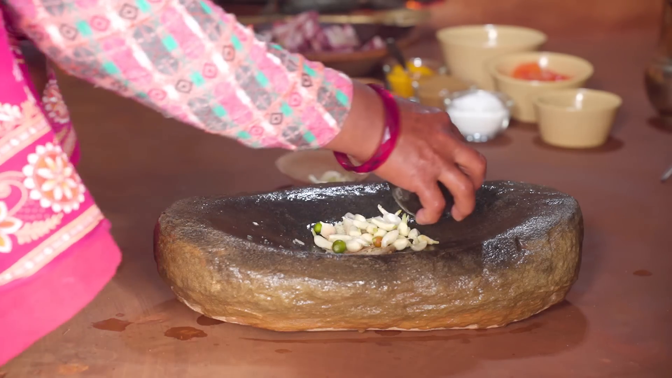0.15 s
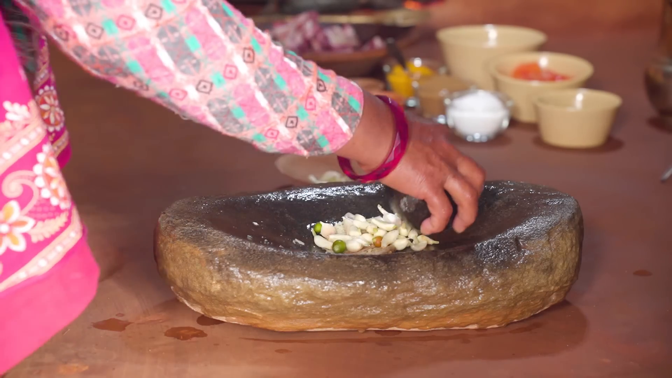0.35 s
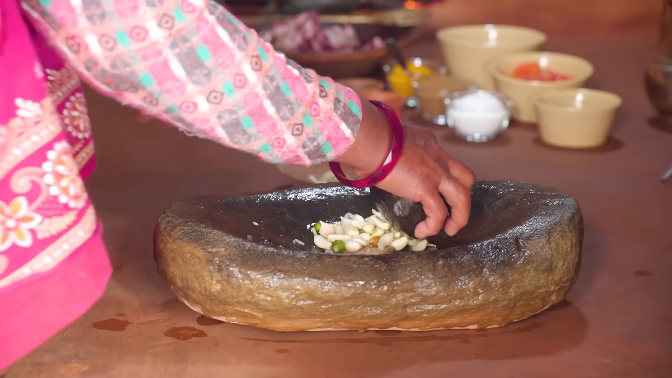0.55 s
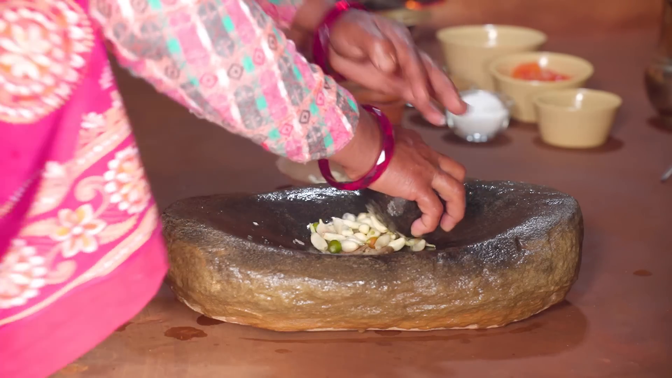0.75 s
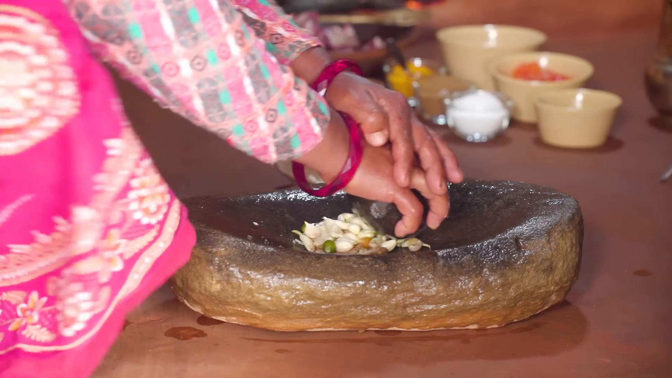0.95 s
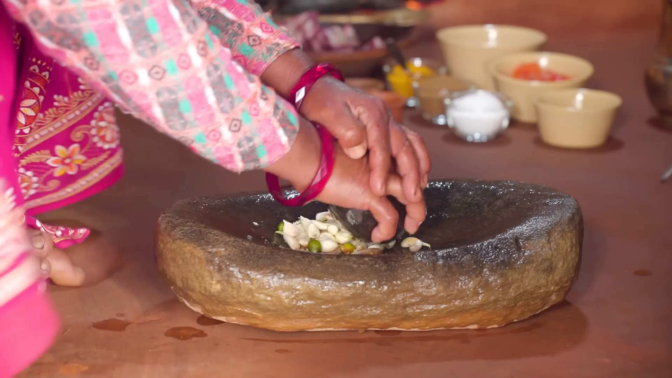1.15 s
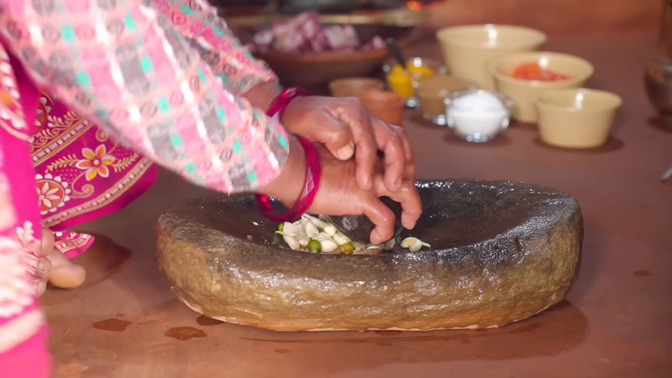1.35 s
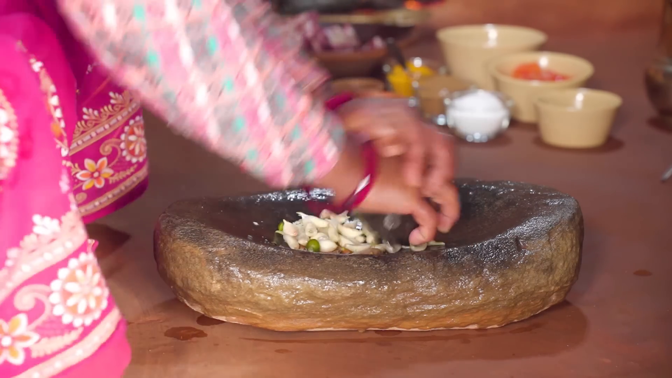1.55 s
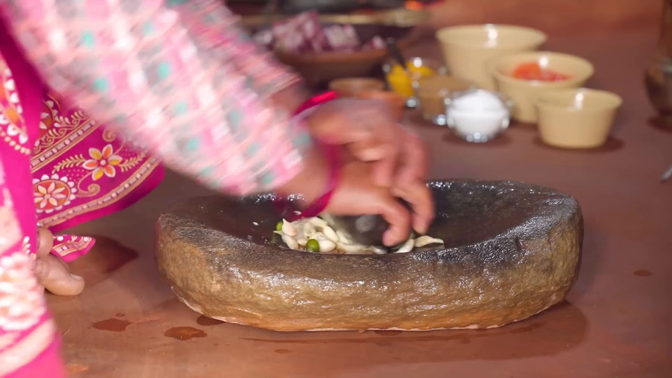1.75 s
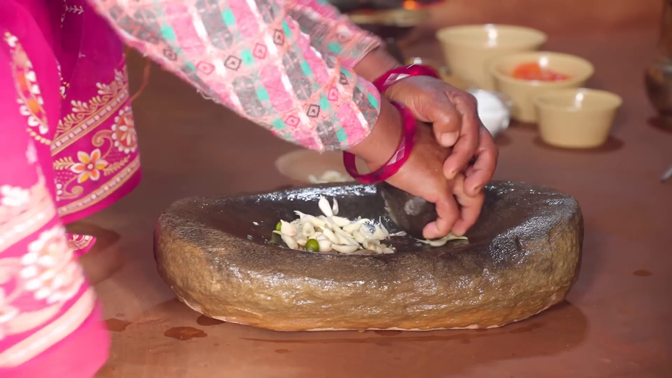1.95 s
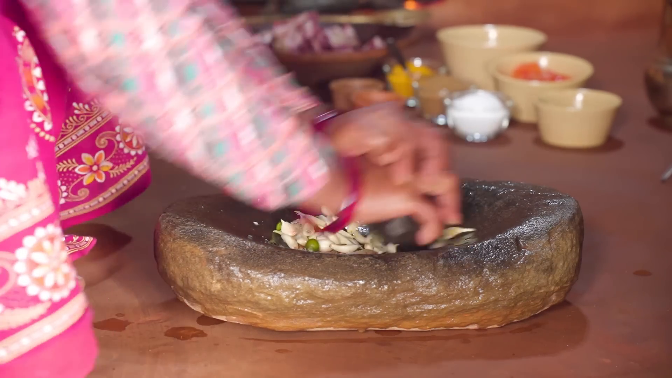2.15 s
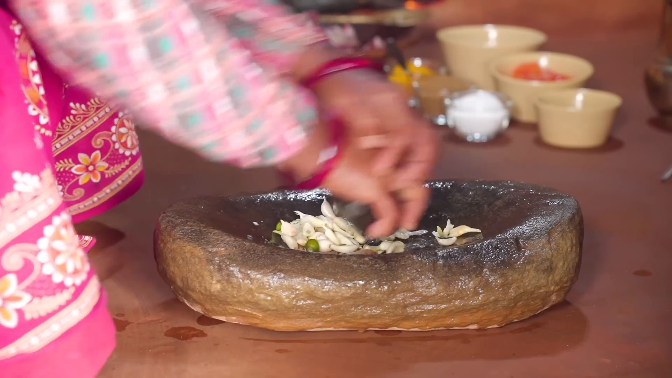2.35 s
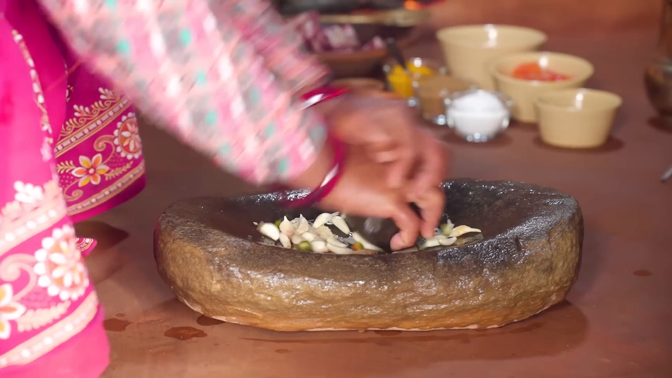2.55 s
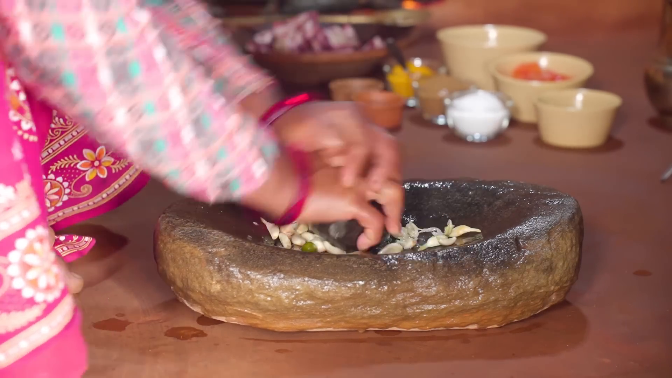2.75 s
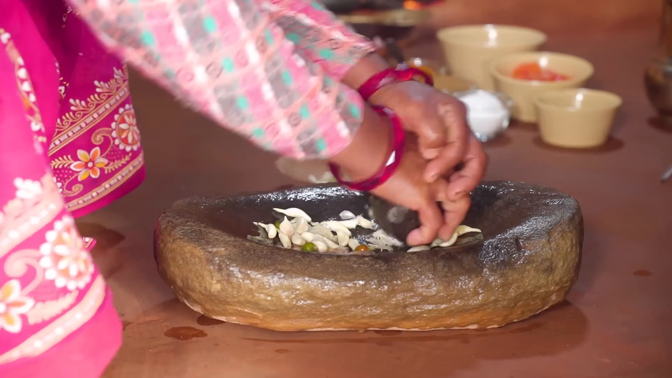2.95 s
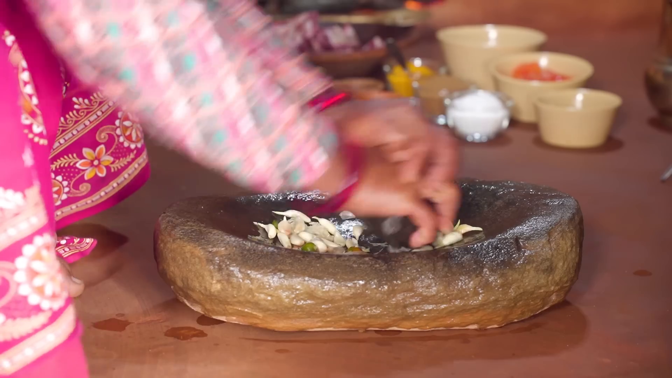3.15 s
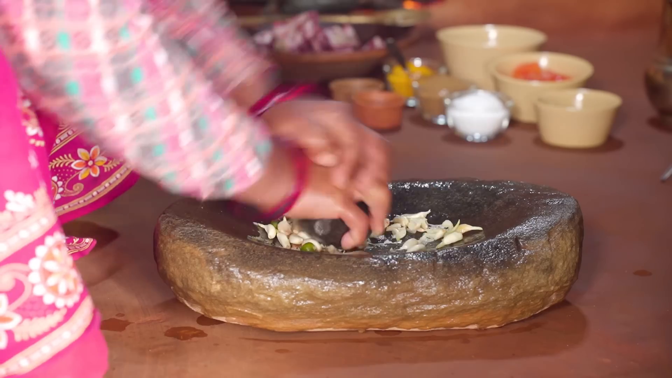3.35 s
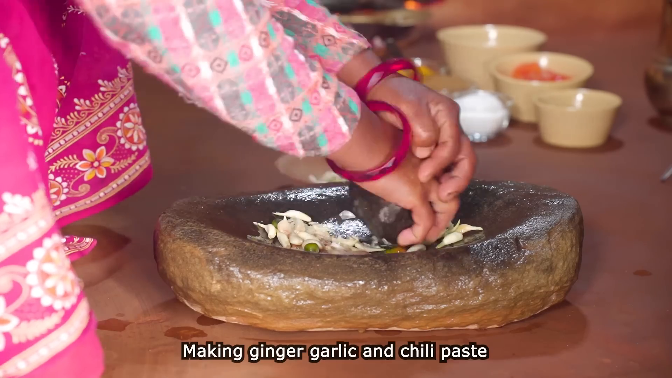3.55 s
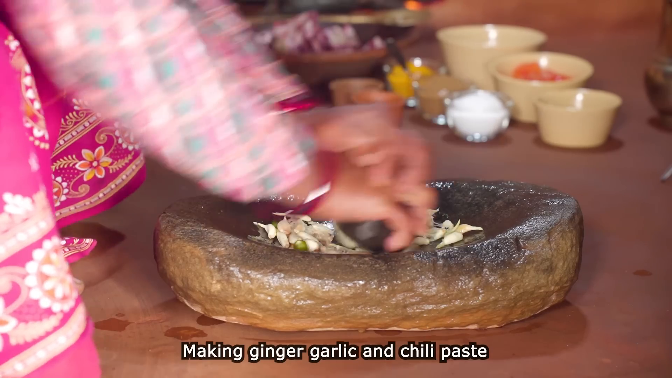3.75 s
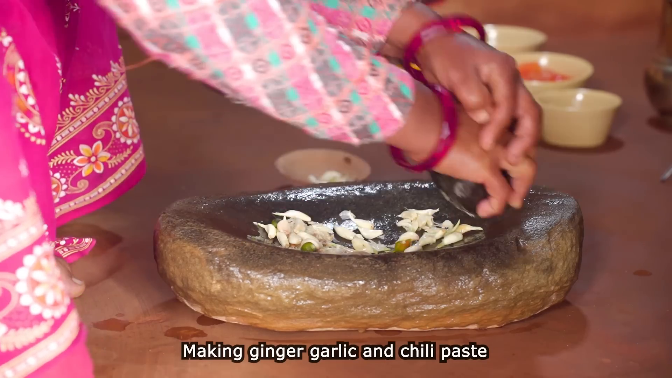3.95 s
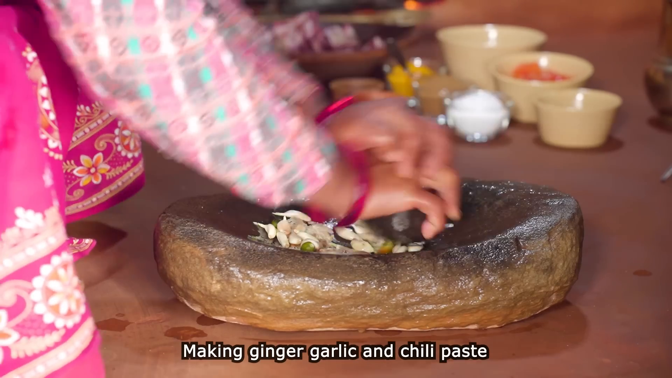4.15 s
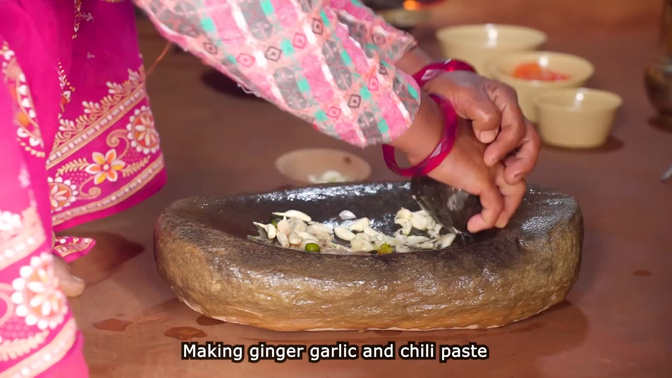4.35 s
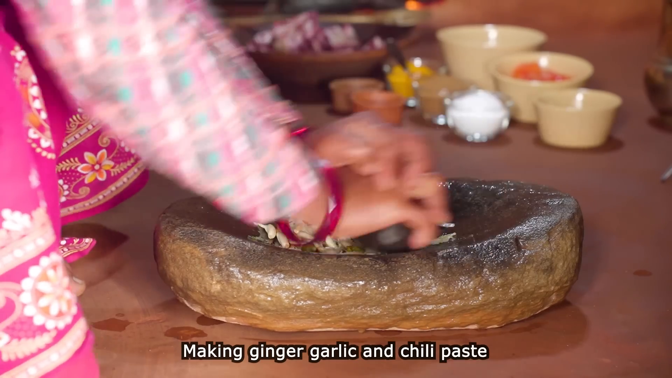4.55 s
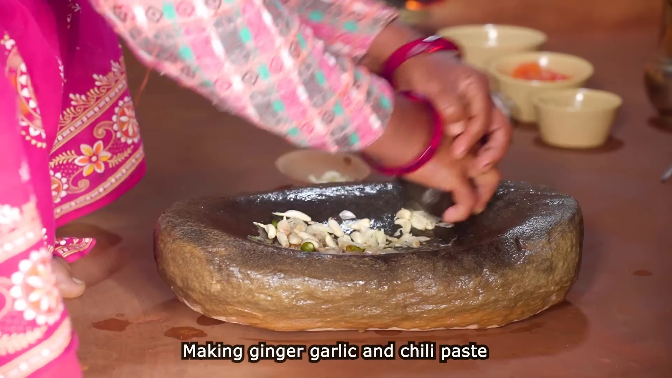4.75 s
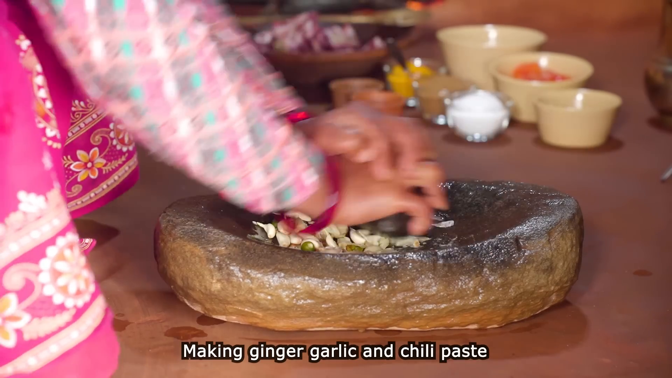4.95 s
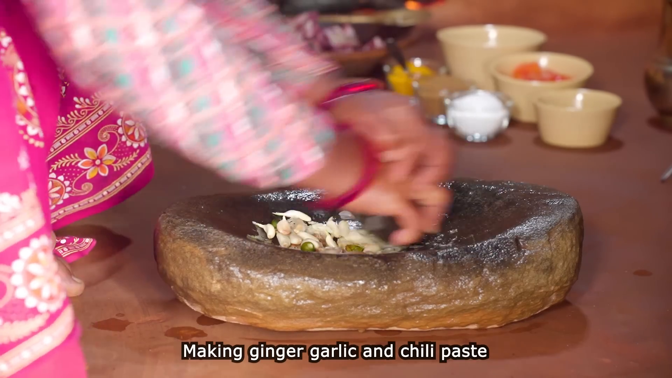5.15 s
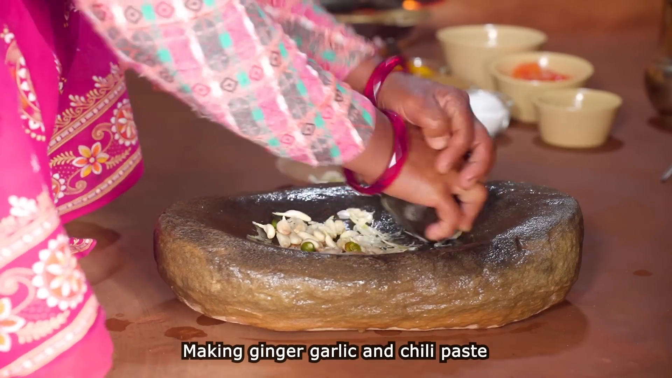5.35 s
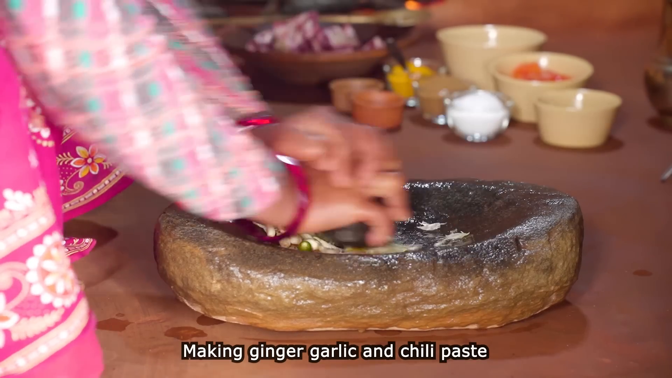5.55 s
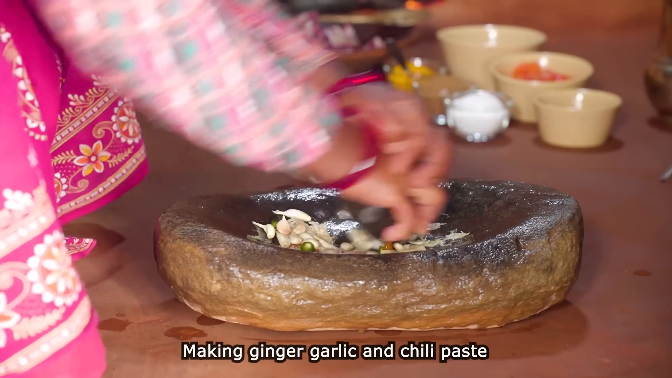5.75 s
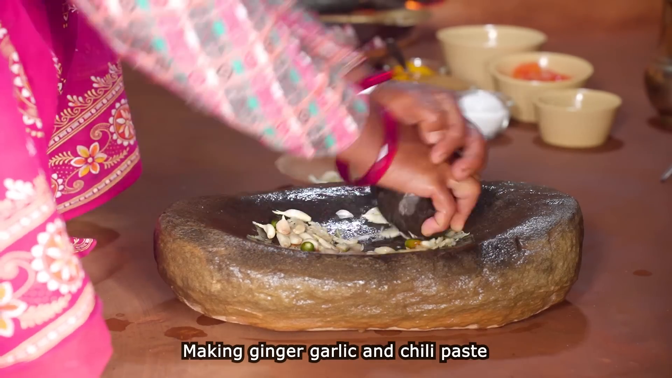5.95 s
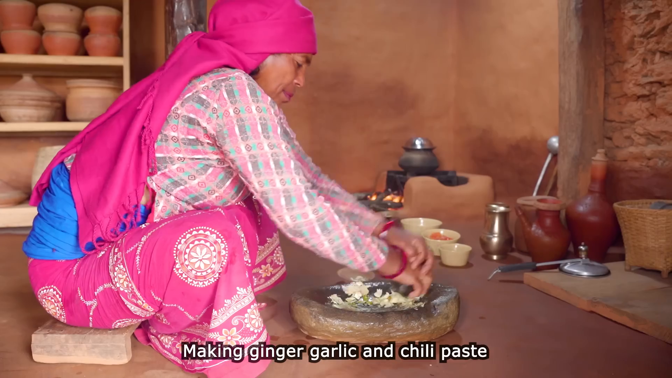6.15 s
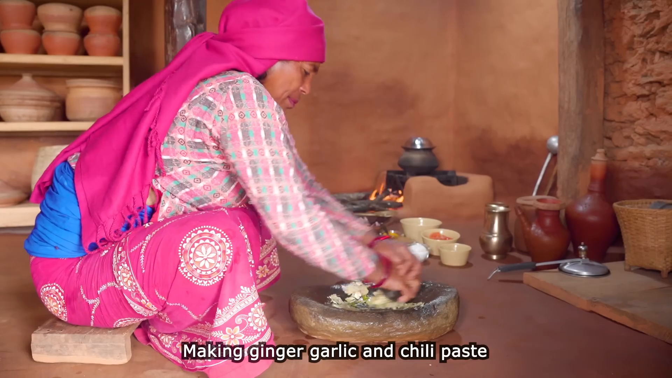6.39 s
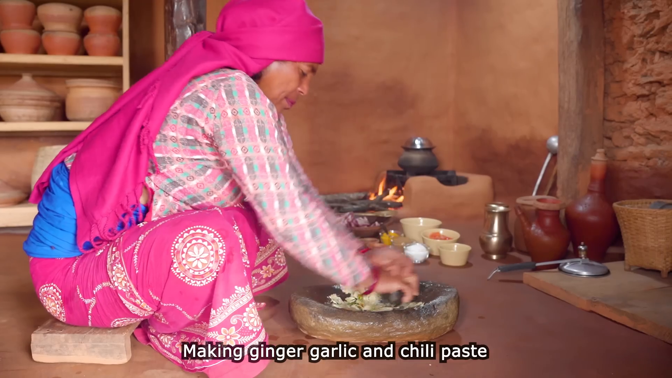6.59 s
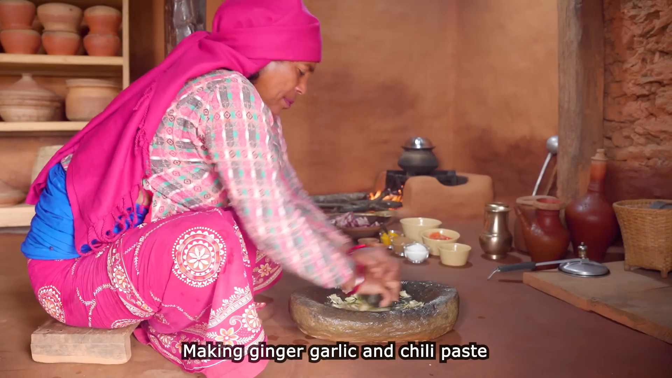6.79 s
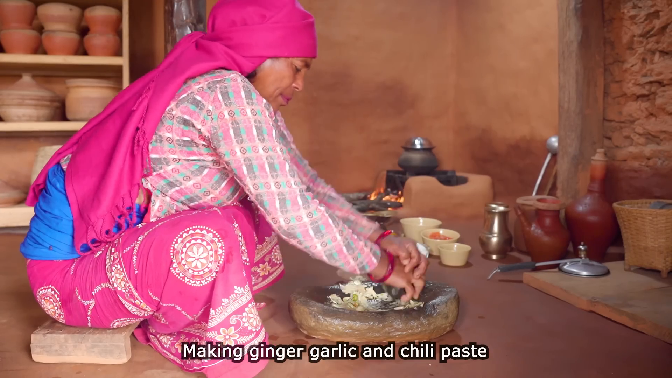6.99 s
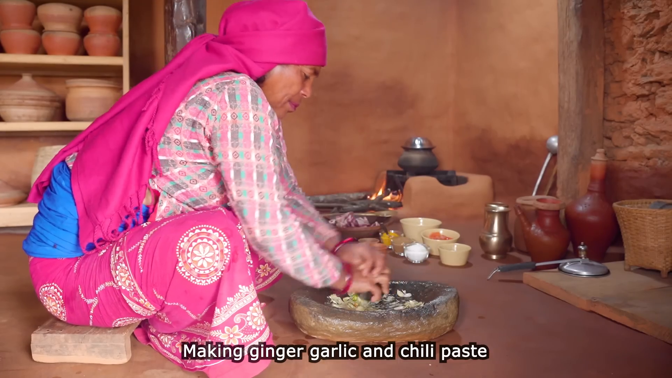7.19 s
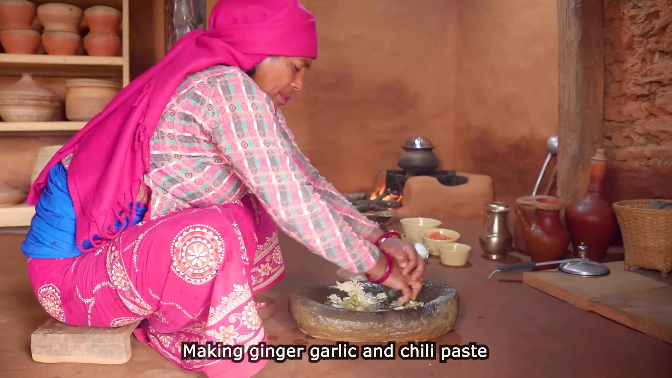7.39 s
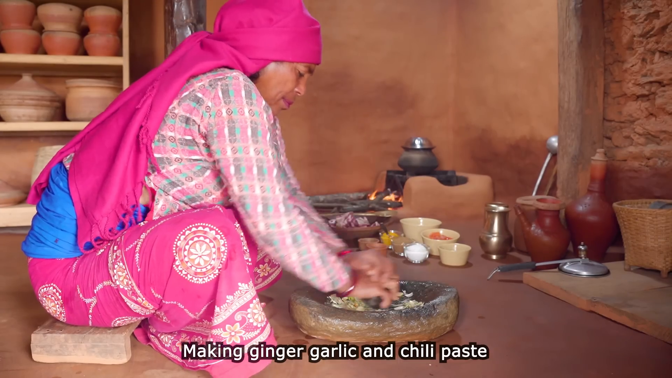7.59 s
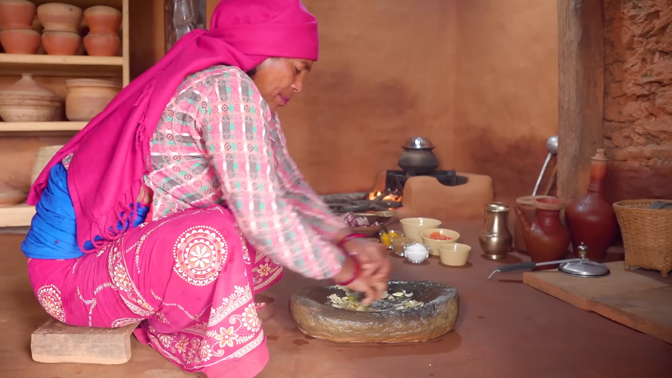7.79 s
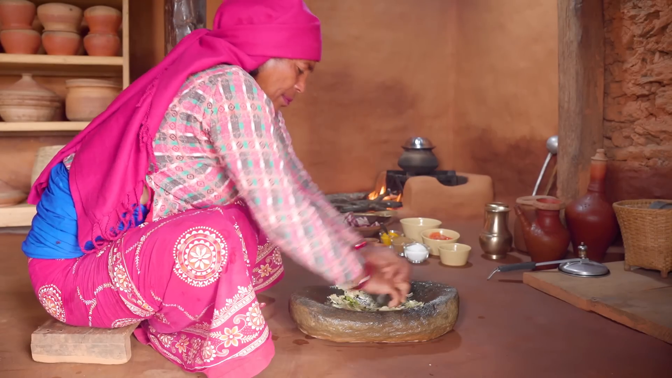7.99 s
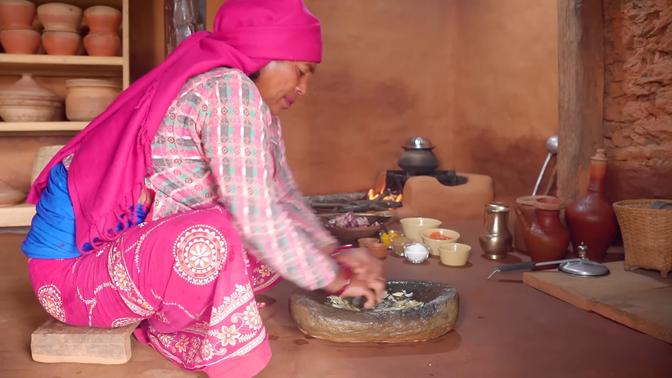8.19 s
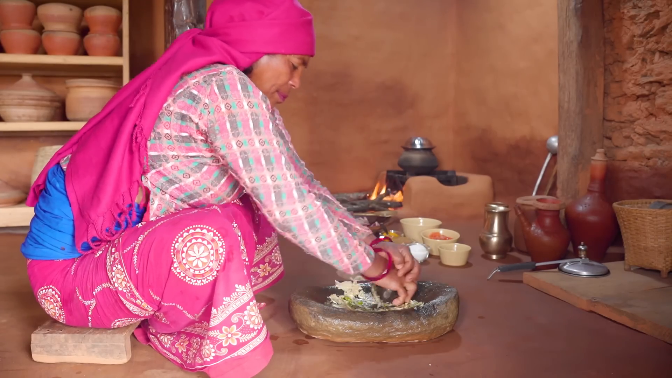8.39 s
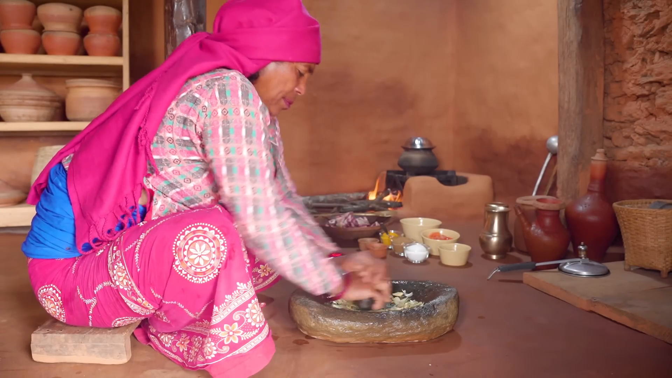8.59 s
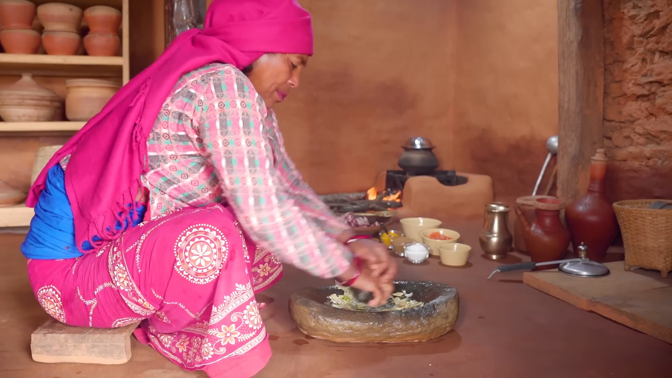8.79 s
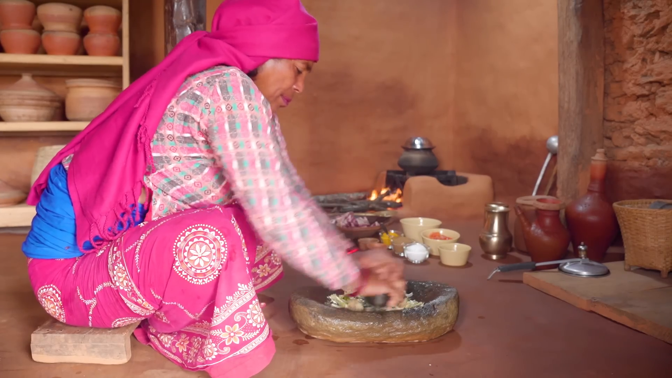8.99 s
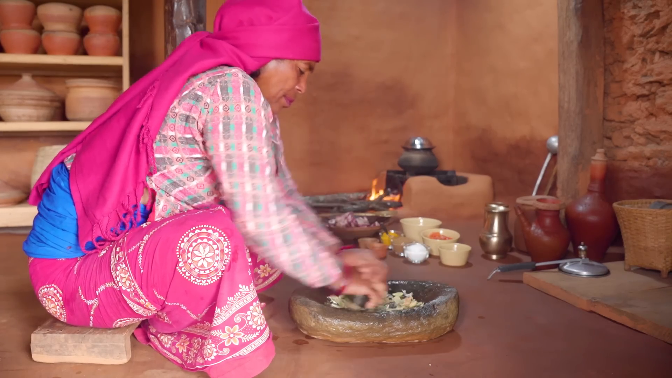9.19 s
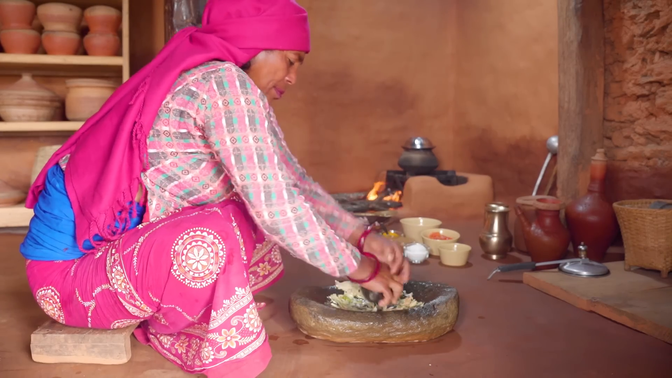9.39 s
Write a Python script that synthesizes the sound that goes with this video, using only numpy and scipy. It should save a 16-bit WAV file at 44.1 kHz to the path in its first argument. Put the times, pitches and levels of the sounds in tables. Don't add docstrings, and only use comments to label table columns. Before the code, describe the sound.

A hand-held stone works garlic, ginger and chili on a stone slab in a small earth-walled kitchen. Light scrapes and faint ticks come first, then from about one and a half seconds steady crunching strokes, roughly three a second, with wet hiss, gritty drag and sharp clove snaps. Stone knocks ring briefly, mostly in the middle. Close stereo microphone, short room reflections, faint hiss.

```python
import sys
import numpy as np
from scipy import signal
from scipy.io import wavfile
from scipy.ndimage import uniform_filter1d

SR = 44100
rng = np.random.default_rng(int(sys.argv[2]) if len(sys.argv) > 2 else 0)


def magnitude_from_level(level_db):
    exponent = np.asarray(level_db, float) / 20
    return 10 ** exponent


def unload_audio(sound):
    columns = np.transpose(np.atleast_2d(sound))
    steps = np.round(np.clip(columns, -1, 1) * 32767)
    wavfile.write(sys.argv[1], SR, steps.astype(np.int16))


N = 415863


def at_hz(points, hz):
    table_hz, values = np.array(points).T
    return np.interp(np.log(hz), np.log(table_hz), values)


def rms_one(x):
    return x / np.sqrt(np.mean(x ** 2) + 1e-20)


def band(x, low_hz, high_hz):
    edges_hz = [low_hz, min(high_hz, 0.45 * SR)]
    return signal.sosfilt(signal.butter(2, edges_hz, "band", fs=SR, output="sos"), x)


def thin(x, cut_hz):
    return signal.sosfilt(signal.butter(4, cut_hz, "high", fs=SR, output="sos"), x)


def drift(rate_hz):
    pole = np.exp(-2 * np.pi * rate_hz / SR)
    noise = rng.standard_normal(N + SR)
    return rms_one(signal.lfilter([1], [1, -2 * pole, pole * pole], noise)[SR:])


def ring(clicks, hz, t60_s):
    radius = magnitude_from_level(-60 / (t60_s * SR))
    angle = 2 * np.pi * hz / SR
    return signal.lfilter([0, np.sin(angle)], [1, -2 * radius * np.cos(angle), radius * radius], clicks + 1e-18)


def burst(hz, cycles):
    phase = hz * np.arange(400) / SR
    shape = phase * np.exp(-phase / cycles) * np.sin(2 * np.pi * phase)
    return shape / np.max(np.abs(shape))


def grains(per_s, spread_db, low_hz, high_hz, cycles, colour):
    sizes = magnitude_from_level(spread_db * np.minimum(rng.exponential(1, N), 4)) * rng.choice([-1, 1], N)
    born = rng.random(N) < per_s * magnitude_from_level(4.5 * drift(45)) / SR
    pitches_hz = np.geomspace(low_hz, high_hz, num=16)
    dealt = rng.integers(0, 16, N)
    total = 0
    for k, hz in enumerate(pitches_hz):
        clicks = sizes * born * (dealt == k)
        total = total + magnitude_from_level(at_hz(colour, hz)) * hz * ring(clicks, hz, cycles / hz)
    return rms_one(total)


BITE_DB_PER_S, EASE_DB_PER_S = 369, 284


def push(stop_s, length_s, first_db, last_db):
    corners_s = [stop_s - length_s - 1, stop_s - length_s, stop_s, stop_s + 1]
    corners_db = [first_db - BITE_DB_PER_S, first_db, last_db, last_db - EASE_DB_PER_S]
    return np.interp(np.arange(0, N, 64) / SR, corners_s, corners_db)


# stop_s, length_s, first_crunch_db, last_crunch_db, drag_db
STROKES = [(1.552, 0.035, -39, -31, -60), (1.921, 0.15, -65, -38.5, -62), (2.226, 0.098, -55, -43, -75),
           (2.58, 0.065, -49.5, -35.5, -60.5), (2.914, 0.07, -44.5, -41.5, -56),
           (3.19, 0.076, -53, -43, -68), (3.499, 0.067, -62.5, -39.5, -60.5), (3.818, .15, -65, -44, -72),
           (4.35, .18, -53.5, -54, -69), (4.608, 0.05, -45, -38.5, -53), (5.037, 0.26, -75.5, -44.5, -64),
           (5.32, 0.1, -53.5, -44, -62.5), (5.607, 0.039, -55.5, -34, -57.5), (5.976, 0.12, -46, -47, -71),
           (6.142, 0.12, -69, -55, -73), (6.65, 0.23, -58, -48, -70), (6.973, 0.12, -55, -49, -68),
           (7.353, 0.14, -60.5, -48, -68), (7.673, 0.28, -76.5, -51.5, -65),
           (8.016, 0.087, -54, -40.5, -60.5), (8.348, 0.23, -72.5, -39, -55.5),
           (8.672, 0.24, -68, -47.5, -66), (9.047, 0.047, -52, -47, -70), (9.364, 0.12, -50.5, -45.5, -86)]
# stop_s, length_s, first_crunch_db, last_crunch_db, drag_db
NUDGES = [
    (.24, 0.29, -64.5, -88, -72),
    (0.49, .05, -95, -81, -85),
    (0.871, 0.16, -62, -63.5, -68),
    (1.174, .19, -73, -56.5, -64),
    (1.357, 0.088, -56.5, -79, -65),
    (2.803, 0.066, -63.5, -58, -80),
    (5.153, 0.013, -72, -73, -69),
    (5.794, 0.085, -61.5, -62, -72.5),
    (7.134, 0.088, -63, -89, -75),
    (8.93, .01, -76.5, -66, -74),
]
CRUNCH_REST_DB, DRAG_REST_DB = -96, -85.5
WET_DB, WET_FOLLOWS = -53, 0.58
DRAG_FOLLOWS = 0.74


def effort():
    rows = np.array(STROKES + NUDGES)
    pushes_db = np.array([push(*row[:4]) for row in rows])
    drags_db = rows[:, 4:] + DRAG_FOLLOWS * (pushes_db - pushes_db.max(axis=1, keepdims=True))

    def strongest(levels_db, rest_db):
        coarse_db = np.maximum(levels_db.max(axis=0), rest_db)
        return np.interp(np.arange(N) / 64, np.arange(len(coarse_db)), coarse_db)

    crunch_db = strongest(pushes_db, CRUNCH_REST_DB)
    juice_db = WET_DB + WET_FOLLOWS * (crunch_db + 45)
    return crunch_db, juice_db, strongest(drags_db, DRAG_REST_DB)


# hz, level_db (per Hz)
CRUNCH = [(1500, -17.5), (1900, -12.5), (2600, 6), (3500, -9.5), (4500, 5.5), (6000, 2.5), (9000, -6.5)]
# hz, level_db (per Hz)
JUICE = [(8500, -1.5), (11000, -13), (13500, -11), (16000, -6)]
# hz, level_db (per Hz)
RUMBLE = [(600, -7.5), (900, -0.5), (1400, 0.5), (2000, 7.5)]


def strokes():
    crunch_db, juice_db, rumble_db = effort()
    crunch = grains(2600, 5.3, 1500, 9000, 7, CRUNCH)
    juice = grains(6000, 4.5, 8500, 16000, 7, JUICE)
    rumble = grains(2500, 3, 600, 2000, 7, RUMBLE)
    mix = magnitude_from_level(crunch_db) * thin(crunch, 2350)
    mix = mix + magnitude_from_level(juice_db) * juice + magnitude_from_level(rumble_db) * rumble
    return magnitude_from_level(-5.0) * mix


# start_s, peak_db, pitch_hz, treble_db, jolt_db (both re peak)
CLOVES = [(1.5425, -22, 5260, -30, -12), (1.572, -17.5, 5170, -14, -18), (1.5952, -25, 5500, -4.5, -25),
          (1.8845, -33, 4530, 5.5, -6), (1.9074, -23.5, 5350, -27, -39), (2.5152, -15.5, 7740, -18, -16),
          (2.58, -10.5, 4780, -35, -20), (2.8203, -12.5, 4720, -9.5, -44), (2.9033, -26, 4400, -7, -18),
          (3.1559, -21.5, 8000, -16, -13), (3.47, -21, 4760, -38, -11.5), (3.7706, -11, 8440, -17.5, -19),
          (4.3064, -21, 5400, -1, -36), (4.587, -12.5, 7740, -30, -14.5), (4.6, -24, 4340, -40, -6),
          (4.9491, -31, 5970, -6, -30), (5.5898, -24, 4530, 1, -5), (5.6199, -18.5, 3900, -26, -14.5),
          (6.9326, -22.5, 8300, -17, -21), (7.9506, -26, 2960, -6, -7), (7.9667, -24, 4670, -52, -10),
          (8.3079, -8.5, 8300, -8.5, -16.5), (9.0265, -25.5, 4500, -13, -29), (9.3138, -25, 5100, -39, -5)]
# start_s, peak_db, pitch_hz
SKINS = [(0.2915, -54.5, 8800), (0.5297, -51, 9950), (.9765, -52, 9700), (1.3465, -42, 7360),
         (1.479, -45, 2680), (1.4946, -34, 3180), (1.52, -31.5, 2870), (1.7794, -47, 5530),
         (2.0797, -51, 4700), (2.166, -35.5, 5360), (2.4713, -31, 5600), (2.751, -48.5, 4560),
         (3.0656, -54, 4960), (3.107, -43, 3670), (3.4145, -44, 5260), (3.4546, -32, 5700),
         (3.5255, -34, 4700), (3.727, -45, 3250), (4.357, -41.5, 8000), (4.8597, -34, 5460),
         (5.024, -32.5, 8800), (5.1383, -43, 8700), (5.2295, -40, 5900), (5.4582, -33.5, 5450),
         (5.6673, -33, 5330), (6.8756, -43, 4430), (7.2667, -38.5, 5130), (7.784, -53.5, 3160),
         (8.917, -41.5, 6440), (9.233, -41, 6100)]
# start_s, peak_db, pitch_hz
FIBRES = [(.6619, -55, 2820), (1.0244, -46, 5800), (1.8585, -47, 2830), (2.2426, -32.5, 2800),
          (2.8627, -30.5, 3940), (2.9696, -39, 4200), (3.6734, -39.5, 5700), (4.2432, -33.5, 4380),
          (4.2838, -28.5, 7200), (4.5287, -32.5, 6560), (4.57, -40, 5800), (5.0104, -50, 4460),
          (5.3143, -34.5, 3820), (5.54, -33.5, 4900), (5.8293, -41, 5560), (5.874, -31.5, 4840),
          (6.108, -49, 5150), (6.5317, -33, 3060), (6.895, -26, 6500), (6.906, -43, 4120),
          (6.981, -42, 6000), (7.581, -31.5, 4750), (7.601, -32, 5860), (7.898, -32.5, 3940),
          (8.2423, -42, 4200), (8.6428, -34, 6050), (8.6636, -38, 3900), (8.972, -40, 5400),
          (9.2736, -38, 5000), (9.357, -35, 5500)]
SKIN_TREBLE_DB, SKIN_JOLT_DB, SKIN_TEAR = -2.5, -62.5, 0.8
FIBRE_TREBLE_DB, FIBRE_JOLT_DB, FIBRE_TEAR = -12, -32, 0.3


def breaks():
    cloves = [(*row, 0) for row in CLOVES]
    skins = [(*row, SKIN_TREBLE_DB, SKIN_JOLT_DB, SKIN_TEAR) for row in SKINS]
    fibres = [(*row, FIBRE_TREBLE_DB, FIBRE_JOLT_DB, FIBRE_TEAR) for row in FIBRES]
    return sorted(cloves + skins + fibres)


FIBRE_CUT_HZ = 2150


def snaps():
    cracks, jolts = np.zeros((2, N + 400))
    events = breaks()
    chance = rng.random((len(events), 3))
    for (start_s, peak_db, pitch_hz, treble_db, jolt_db, tear), (u, w, late) in zip(events, chance):
        crack = burst(pitch_hz, cycles=0.7) + 0.55 * burst(3400 + 1600 * w, cycles=0.45)
        crack += magnitude_from_level(treble_db + 4) * burst(8300 + 3700 * u, cycles=0.92)
        crack -= 0.4 * np.roll(crack, 10 + int(30 * late))
        crack += tear * (np.roll(crack, 70 + int(60 * w)) - np.roll(crack, 170 + int(90 * u)))
        stone = burst(1700 + 200 * w, cycles=1.1)
        stone += 0.8 * burst(2300 + 400 * u, cycles=1.1)
        stone += 0.35 * burst(1050, cycles=0.6)
        at = round(start_s * SR)
        cracks[at:at + 400] += magnitude_from_level(peak_db - 1.0) * crack
        jolts[at:at + 400] += magnitude_from_level(peak_db - 1.0) * magnitude_from_level(jolt_db - 7) * stone
    return thin(band(cracks[:N], FIBRE_CUT_HZ, SR), 0.5 * FIBRE_CUT_HZ) + jolts[:N]


# mode_hz, level_db, t60_s
PESTLE = [(1833, -3, 0.072), (2750, -5.5, 0.033), (4574, -15.5, 0.048), (8396, -1, 0.058)]


def pestle(food):
    rings = sum(magnitude_from_level(level_db - 37.5) * ring(food, mode_hz, min(t60_s, 0.03))
                for mode_hz, level_db, t60_s in PESTLE)
    return food + rings


# start_s, peak_db, hardness_db (upper ring re peak)
KNOCKS = [(0.708, -54, 2.5), (1.464, -59, 7), (2.208, -45, 0.5), (2.917, -29, -9.5), (3.214, -44, -2),
          (4.087, -19.5, -1.5), (4.359, -50.5, -16), (4.483, -20.5, -1), (4.957, -20, 1),
          (5.073, -40.5, -29), (5.129, -47, -4), (5.178, -32, -20.5), (5.35, -40, -6.5), (5.928, -40.5, -9),
          (6.133, -50, -14), (6.363, -19.5, -4), (7.186, -22, -5), (7.376, -45, -8.5), (7.663, -50.5, -7.5),
          (7.95, -55.5, 6)]
# mode_hz, level_db, t60_s
SLAB = [(770, -31.5, 0.055), (826, -6.5, 0.19), (976, 3, 0.19), (1051, 0.5, 0.23), (1183, 5.5, 0.077),
        (1190, -9, 0.19), (1390, 1.5, 0.2), (1775, 6.5, 0.12), (1928, -1.5, 0.21), (2100, -14, 0.047),
        (2530, 9.5, 0.052), (2900, 4, 0.063)]
SOFT_HZ, HARD_HZ_PER_DB = 963, 9.5


def knocks():
    pulse = np.zeros(N + 400)
    for start_s, peak_db, hardness_db in KNOCKS:
        hard = burst(1860, cycles=1.2)
        hard += magnitude_from_level(-5) * burst(2450, cycles=0.8)
        hard += magnitude_from_level(-3) * burst(1250, cycles=0.8)
        dull = burst(SOFT_HZ + HARD_HZ_PER_DB * hardness_db, cycles=0.45)
        dull += 0.18 * burst(534, cycles=0.99)
        at = round((start_s + 0.001) * SR)
        pulse[at:at + 400] += magnitude_from_level(peak_db - 1) * (magnitude_from_level(hardness_db) * hard + magnitude_from_level(-5.5) * dull)
    pulse = pulse[:N]
    sides_db = rng.normal(0, 1.5, (len(SLAB), 2, 1))
    rings = 0
    for k, (mode_hz, level_db, t60_s) in enumerate(SLAB):
        gain = magnitude_from_level(level_db - 43 + sides_db[k]) * (-1) ** k
        rings = rings + gain * ring(pulse, mode_hz, min(t60_s, 0.13))
    return pulse, rings


# delay_s, level_db
ECHOES = [(.0019, -14), (.0056, -10), (.0092, -14), (.0135, -13), (.019, -15)]
# hz, t60_s
ROOM_T60 = [(300, .2), (1000, .14), (3000, .125), (8000, .12), (15000, .09)]
# hz, hold_s
ROOM_HOLD = [(1000, .018), (2500, .014), (5000, .007)]
# hz, share
ROOM_SIDE = [(300, .25), (600, 0.3), (1200, 0.76), (4000, 0.87), (9000, 0.92), (14000, 0.28)]


def room(x, tail_db):
    t = np.arange(SR // 3) / SR
    edges_hz = 150 * 2 ** np.arange(0, 7.1, 0.25)
    white = rng.standard_normal((2, 2, len(t)))
    tail = 0
    for k, (low_hz, high_hz) in enumerate(zip(edges_hz, edges_hz[1:])):
        hz = np.sqrt(low_hz * high_hz)
        fall = magnitude_from_level(-60 * np.maximum(t - at_hz(ROOM_HOLD, hz), 0) / at_hz(ROOM_T60, hz))
        mid, side = [np.sqrt(hz) * rms_one(fall * part) for part in band(white[k % 2], low_hz, high_hz)]
        tail = tail + mid + at_hz(ROOM_SIDE, hz) * side * [[1], [-1]]
    lumps_db = 4 * rms_one(uniform_filter1d(rng.standard_normal(len(t)), size=70))
    onset = np.clip((t - 0.001) / 0.00033, 0, 1)
    reply = magnitude_from_level(tail_db) * rms_one(magnitude_from_level(lumps_db) * tail) * onset
    for delay_s, level_db in ECHOES:
        smear = rng.standard_normal(40) + 0.7 * rng.standard_normal((2, 40))
        at = round(delay_s * SR)
        reply[:, at:at + 40] += magnitude_from_level(level_db) * smear * np.hanning(40) / 5
    return signal.oaconvolve(x[None], reply, axes=1)[:, :N]


def moving_room(sent):
    spot = 2 * np.pi * 0.8 * np.arange(N) / SR
    spot += 1.4 * np.sin(29 * spot)
    return room(sent * np.cos(spot), tail_db=-36.5) + room(sent * np.sin(spot), tail_db=-36.5)


def floor_thud(wet):
    thud = band(band(wet.mean(axis=0) + 0.28 * wet, 83, 370), 82, 310)
    return magnitude_from_level(-28.5) * thin(thud, 80)


# multiple, level_db
HOOT_ORDERS = [(2.39, -5), (2.97, 3), (3.45, 1.5)]
HOOT_HZ, HOOT_S, HOOT_DB = 686, 8.025, -68
HOOT_RISE_DB_PER_S, HOOT_SAG_DB_PER_S = 520, 90
CREST_S, CREST_DB, CREST_FADE_DB_PER_S, CREST_RISE_PER_S = 8.135, -68, 500, 0.5


def hoot():
    phase = 2 * np.pi * np.cumsum(HOOT_HZ * (1 + 0.0015 * drift(8))) / SR
    t = np.arange(N) / SR
    start_drop_db, crest_drop_db = [np.maximum(HOOT_RISE_DB_PER_S * (s - t), HOOT_SAG_DB_PER_S * (t - s))
                                    for s in (HOOT_S, CREST_S)]
    tone_db = HOOT_DB - np.minimum(start_drop_db, crest_drop_db)
    tone_db = tone_db - HOOT_RISE_DB_PER_S * np.maximum(t - CREST_S - 0.075, 0)
    over_db = CREST_DB - CREST_FADE_DB_PER_S * np.abs(t - CREST_S)
    slid_phase = phase + np.pi * HOOT_HZ * CREST_RISE_PER_S * (t - CREST_S) ** 2
    overtones = sum(magnitude_from_level(level_db) * np.sin(multiple * slid_phase) for multiple, level_db in HOOT_ORDERS)
    return magnitude_from_level(tone_db) * np.sin(phase) + magnitude_from_level(over_db) * overtones


# hz, level_db (per Hz)
HISS = [(24, -51.5), (112, -13), (382, -5.5), (1020, 4.5), (2570, 2), (6170, 0), (11600, -9.5), (14800, 4)]
# hz, likeness
HISS_ALIKE = [(60, .8), (250, .8), (600, 0.3), (2000, 0.094), (8000, 0.1), (16000, 0.1)]
HISS_DB = -67.5


def hiss():
    edges_hz = 22 * 2 ** np.arange(0, 9.8, 0.5)
    flicker_db = 0.6 * drift(2.5)
    white = rng.standard_normal((2, 2, N))
    out = 0
    for k, (low_hz, high_hz) in enumerate(zip(edges_hz, edges_hz[1:])):
        mid, side = band(white[k % 2], low_hz, high_hz)
        hz = np.sqrt(low_hz * high_hz)
        alike = np.clip(at_hz(HISS_ALIKE, hz), -1, 1)
        pair = np.sqrt(1 + alike) * mid + np.sqrt(1 - alike) * side * [[1], [-1]]
        out = out + magnitude_from_level(at_hz(HISS, hz)) * pair
    return magnitude_from_level(HISS_DB + flicker_db) * rms_one(out)


BASS_CUT_HZ = 720


def scene():
    pulse, rings = knocks()
    food = pestle(strokes() + snaps())
    wet = moving_room(magnitude_from_level(-2.5) * food + pulse)
    left, right = food + pulse + rings + wet
    left = signal.lfilter([0.25, 1], [1, 0.25], left)
    near = thin(np.array([left, right]), BASS_CUT_HZ)
    return near + floor_thud(wet) + hiss() + hoot()


def top_cut(x):
    return signal.sosfilt(signal.butter(12, 17020, fs=SR, output="sos"), x)


TOP_CUT_HZ = 16100


def record(dry):
    top = signal.cheby2(10, 45, TOP_CUT_HZ + 700, fs=SR, output="sos")
    return top_cut(signal.sosfilt(top, dry))


dry = scene()
out = record(dry)
unload_audio(out)
```